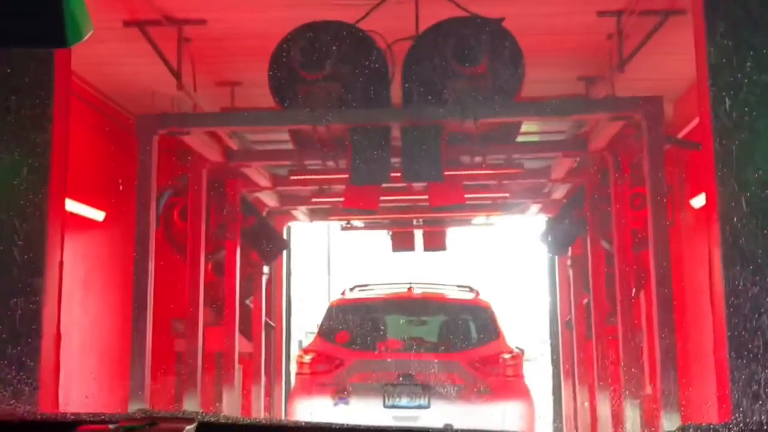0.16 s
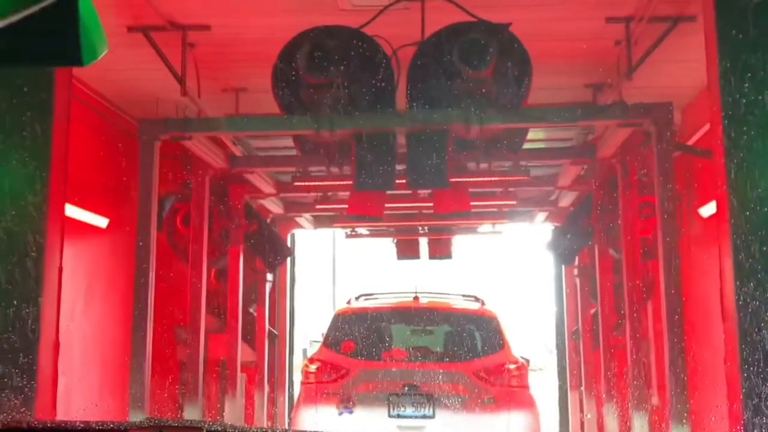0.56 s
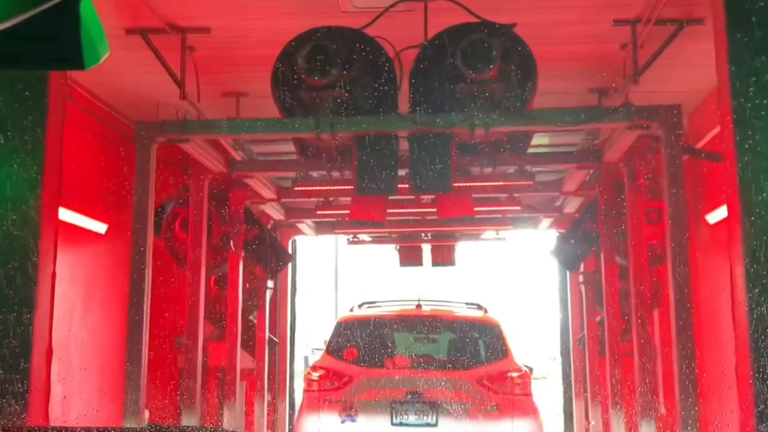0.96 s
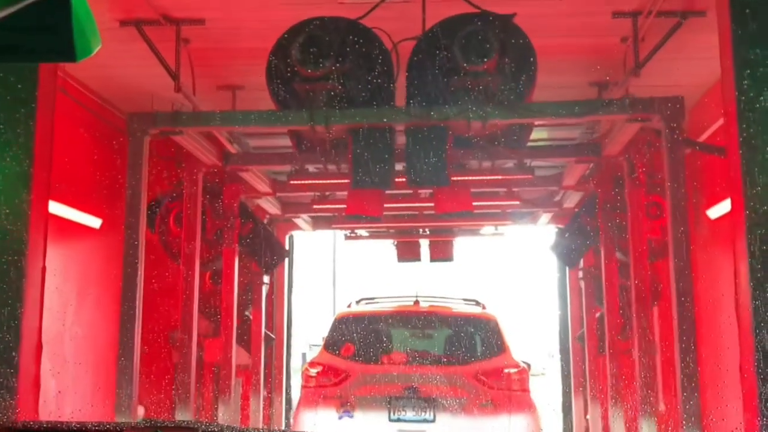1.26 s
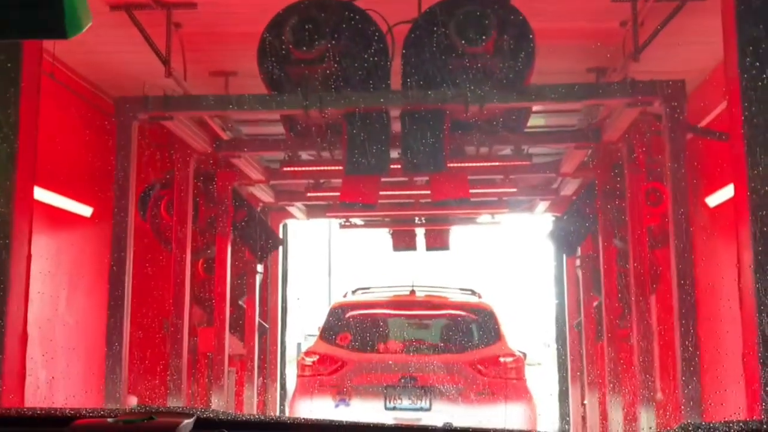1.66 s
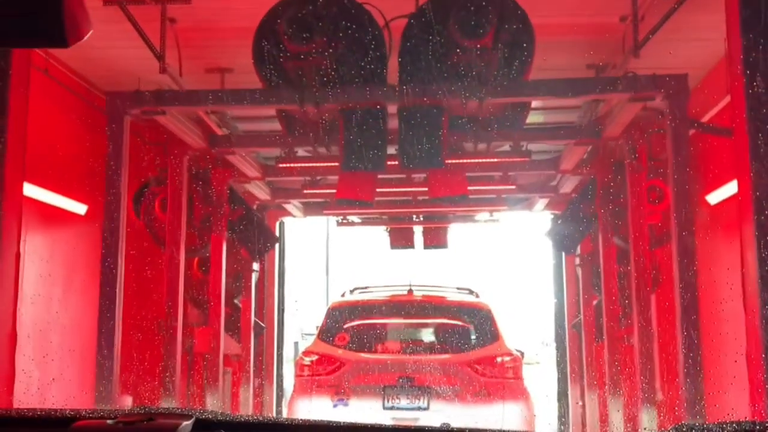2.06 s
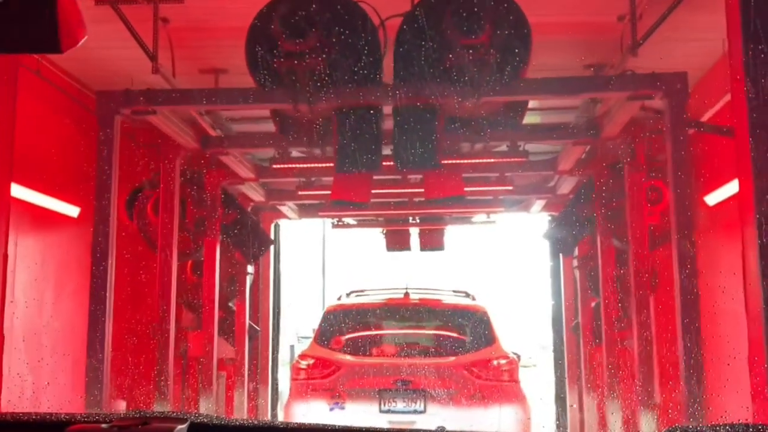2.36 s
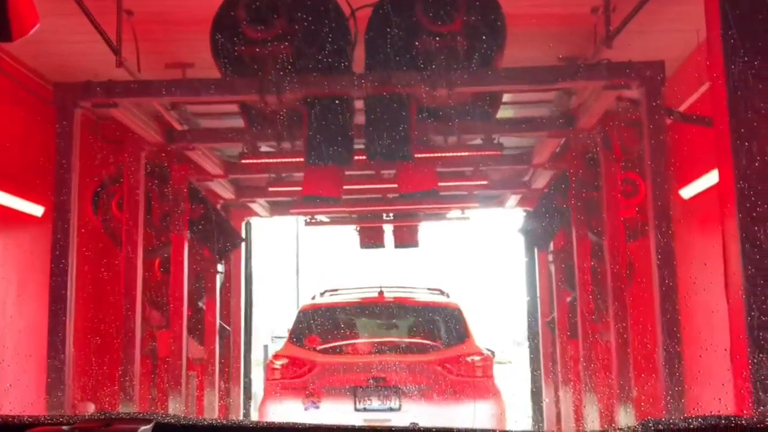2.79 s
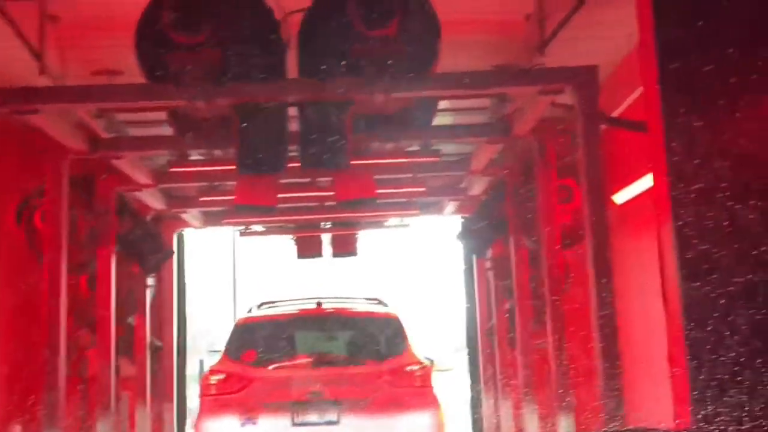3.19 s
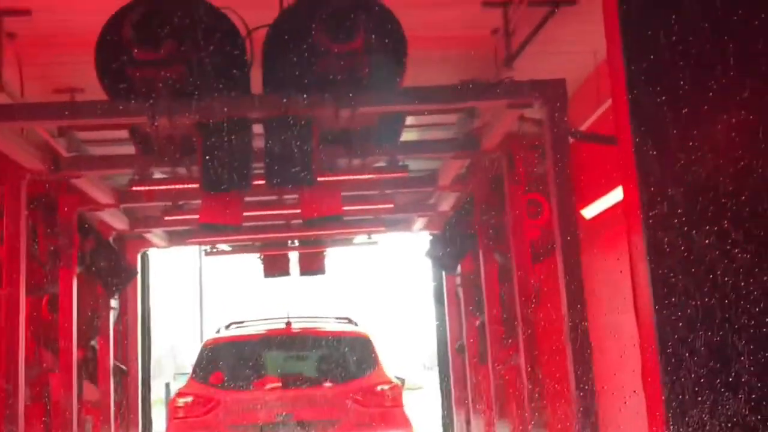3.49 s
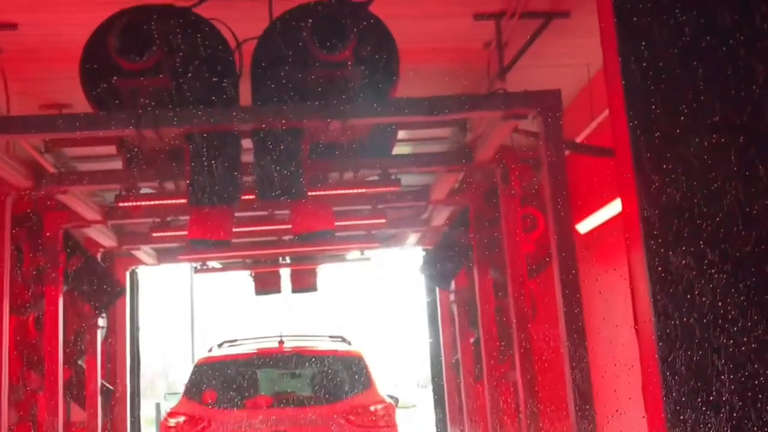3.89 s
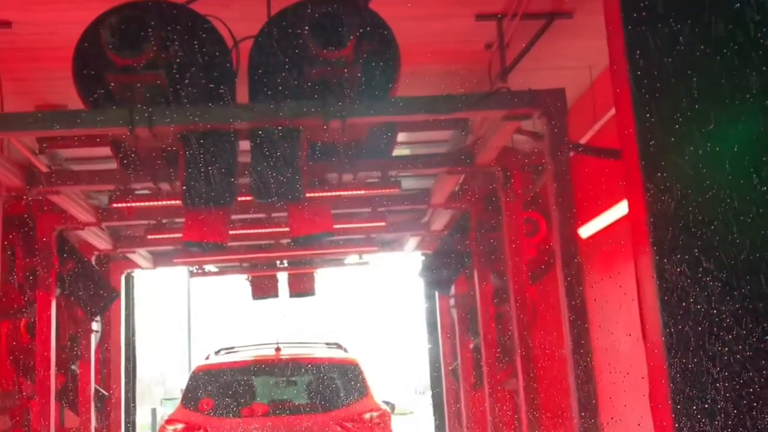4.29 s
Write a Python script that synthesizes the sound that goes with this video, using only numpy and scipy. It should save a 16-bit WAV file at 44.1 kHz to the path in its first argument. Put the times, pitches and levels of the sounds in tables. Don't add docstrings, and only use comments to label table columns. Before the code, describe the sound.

Blower air pounds a car in a wash tunnel, heard from the enclosed cabin by a stereo handheld microphone. Low buffeting pumps the air, the roof drums and wind rushes over the glass. Wavering motor tones beat together. Fine high sizzle from a wet seal stops before two seconds, then tiny sputters and another hiss pass; the roar carries on to an abrupt end.

```python
import sys
import numpy as np
from scipy import signal
from scipy.fft import rfft, irfft
from scipy.io import wavfile
from scipy.ndimage import uniform_filter1d

SR = 44100
rng = np.random.default_rng(int(sys.argv[2]) if len(sys.argv) > 2 else 0)


def ratio(d):
    e = np.asarray(d, float) / 20
    return 10 ** e


def materialize(psi):
    bounded = np.clip(np.atleast_2d(psi).T, -1, 1)
    quanta = np.round(bounded * 32767).astype(np.int16)
    wavfile.write(sys.argv[1], SR, quanta)


N = 196016
T_S = np.arange(N) / SR
HZ = np.arange(N // 2 + 1) * SR / N + 1e-3


def along_hz(table):
    hz, value = np.transpose(table)
    return np.interp(np.log(HZ), np.log(hz), value)


def along_time(table):
    s, value = np.transpose(table)
    return np.interp(T_S, s, value)


def level(x):
    return x / np.sqrt(np.mean(x ** 2))


def bell(centre_s, length_s):
    return np.exp(-.5 * ((T_S - centre_s) / length_s) ** 2)


def swells(table):
    return sum(db * bell(s, length_s) for s, db, length_s in table)


def puffs(table):
    return sum(ratio(db) * bell(s, length_s) for s, db, length_s in table)


def walk(rate_hz, levels=None):
    if levels is None:
        levels = rng.standard_normal(128)
    hold = int(SR / rate_hz)
    steps = np.repeat(levels, hold)[:N + hold]
    return 1.3 * uniform_filter1d(uniform_filter1d(steps, hold), hold)[:N]


def turbulence(pair, colour, gust_db, flicker_db, flicker_hz):
    shaped = pair * ratio(along_hz(colour))
    out, gust = 0, walk(2)
    centres_hz = 16 * 2 ** np.arange(0, 10.5, .5)
    draws = rng.standard_normal((len(centres_hz), 2, 128))
    for hz, (slow, quick) in zip(centres_hz, draws):
        if colour[0][0] / 1.5 < hz < colour[-1][0] * 1.5:
            gust = .8 * gust + .6 * walk(2, slow)
            band = np.cos(np.pi / 2 * np.clip(2 * np.log2(HZ / hz), -1, 1)) ** 2
            gain = ratio(gust_db * gust + flicker_db * walk(flicker_hz, quick))
            out = out + irfft(shaped * band, N) * gain
    return level(out)


def delay(lag_s, in_step_hz):
    return np.exp(-2j * np.pi * (HZ - in_step_hz) * lag_s)


# (frequency [Hz], correlation [0-1])
ALIKE = [(30, 1), (140, 0.97), (240, 0.73), (350, 0.97), (500, 0.93), (650, 0), (840, 0.89), (1000, 0.13),
         (1120, 0.48), (1500, 0.4), (4000, 0), (6000, 0.32)]


def cabin_field(lag_s, in_step_hz=0):
    shared, left, right = rfft(rng.standard_normal((3, N)))
    alike = np.clip(along_hz(ALIKE), 0, 1)
    together = np.array([shared, shared * delay(lag_s, in_step_hz)])
    return np.sqrt(alike) * together + np.sqrt(1 - alike) * np.array([left, right])


def shifting_modes(x, patchy_db, order=2):
    _, _, cells = signal.stft(x, nperseg=1024)
    patches = rng.standard_normal(cells.shape[1:])
    patches = uniform_filter1d(uniform_filter1d(patches, size=order, axis=0), size=5, axis=1)
    _, moved = signal.istft(cells * ratio(patchy_db * level(patches)), nperseg=1024)
    return level(moved[:, :N])


# (frequency [Hz], density [dB per Hz])
BOOM = [(16, -45), (24, -26), (33, -9), (39, -1), (44, 0), (48, -2), (53, -4.5), (60, -3.5), (68, -7),
        (80, -14), (100, -50)]
# (time [s], rise [dB], length [s])
CABIN_SWELLS = [(.3, 4, 0.087), (.53, 9, 0.071), (1.3, -2.5, 0.083), (1.65, 6.5, 0.046), (1.8, -8, 0.065),
                (2.2, 3.5, 0.15), (2.45, -3.5, .08), (2.65, 0.5, .1), (3.09, -11, 0.047), (3.4, 2.5, 0.13),
                (3.85, 0, .08), (4.07, 8.5, 0.069), (4.44, 6, .1)]


def cabin_boom(force_db):
    boom = turbulence(cabin_field(-.0003), BOOM, gust_db=-0.5, flicker_db=1.2, flicker_hz=3.3)
    return boom * ratio(-25.5 + 0.83 * force_db + swells(CABIN_SWELLS))


# (frequency [Hz], density [dB per Hz])
ROOF = [(55, -41), (72, -13.5), (88, 0), (100, -2), (116, -0.5), (140, -5), (170, -6.5), (190, -11.5),
        (250, -8.5), (280, -15.5), (420, -16.5), (540, -16), (590, -32.5), (680, -60.5)]
# (time [s], rise [dB], length [s])
ROOF_SWELLS = [(.11, 0.5, 0.047), (.24, 2, 0.092), (.31, 1.5, 0.024), (.54, 3, 0.053), (.75, 1.5, .06),
               (1.52, -1, 0.044), (2.45, 1.5, .06), (2.72, -0.5, 0.067), (3.1, -0.5, .1),
               (3.56, -2, 0.061), (3.7, 1.5, 0.075), (4.1, 2, .08)]


def roof_drum(force_db):
    roof = turbulence(cabin_field(-.00032), ROOF, gust_db=-0.5, flicker_db=0.03, flicker_hz=6.7)
    return roof * ratio(-20.5 + 0.44 * force_db + swells(ROOF_SWELLS))


# (frequency [Hz], density [dB per Hz])
PANES = [(350, -42), (600, -3.5), (656, -3.5), (689, -5), (708, 1), (751, -6), (847, -1.5), (1020, -8),
         (1110, -2.5), (1220, -8), (1460, -4.5), (1750, -15.5), (2280, -49), (3850, -120)]


def pane_ring(force_db):
    panes = turbulence(cabin_field(0.00019), PANES, gust_db=-0.62, flicker_db=-0.33, flicker_hz=12)
    return shifting_modes(panes, patchy_db=2.2) * ratio(-32 + force_db)


# (frequency [Hz], density [dB per Hz])
GLASS = [(1000, -32), (1700, -2.5), (2310, 0.5), (3410, -3.5), (3770, -6), (5250, -17), (6820, -22.5),
         (7800, -36), (10100, -49), (17200, -120)]


def glass_rush(force_db):
    slanted = cabin_field(.00039, in_step_hz=6500)
    glass = turbulence(slanted, GLASS, gust_db=1.2, flicker_db=-0.4, flicker_hz=12)
    return shifting_modes(glass, patchy_db=1.9) * ratio(-36 + force_db)


# (time [s], level [dB])
FORCE = [
    (0, 1.5),
    (.3, 0),
    (1.6, 0.5),
    (1.9, -0.9),
    (2.6, -1.5),
    (3.0, -1),
    (3.5, 0),
    (4.0, -0.7),
    (4.44, -0.9),
]


def jets():
    force_db = along_time(FORCE)
    return cabin_boom(force_db) + roof_drum(force_db) + pane_ring(force_db) + glass_rush(force_db)


def sweep(start_s, end_s, db, drift_db_s, opens_s, shuts_s):
    opening = .5 + .5 * np.tanh((T_S - start_s) / opens_s)
    shutting = .5 + .5 * np.tanh((end_s - T_S) / shuts_s)
    return ratio(db + drift_db_s * (T_S - start_s)) * opening * shutting


LEAK_OPENS_S, LEAK_SHUTS_S = .15, .1
# (frequency [Hz], density [dB per Hz])
LEAK = [(2500, -60), (5000, -5.5), (6500, 0.5), (8000, 0.5), (10000, 0.5), (11000, -5), (12600, -4),
        (13800, -11), (14900, -40), (15200, -66.5)]
# (start [s], end [s], level [dB], drift [dB per s])
SWEEPS = [
    (-.3, 1.68, -57.5, -1.5),
    (2.92, 3.97, -58, -1.5),
]


def leak_hiss(pair):
    dries_s, dries_db_s = 4.05, -25
    opening = ratio(-64 + dries_db_s * np.maximum(T_S - dries_s, 0))
    passes = sum(sweep(*row, LEAK_OPENS_S, LEAK_SHUTS_S) for row in SWEEPS)
    opening = opening + ratio(3) * (passes + ratio(-18) * puffs(SLAP))
    return turbulence(pair, LEAK, gust_db=.3, flicker_db=1.2, flicker_hz=14) * opening


# (frequency [Hz], density [dB per Hz])
SIZZLE = [(12500, -60), (14400, -2), (14900, 0), (15300, -2), (15700, -4), (15800, -50)]


def spray_sizzle(pair):
    ends_s, stops_s = 1.76, .012
    sizzle = turbulence(pair, SIZZLE, gust_db=.8, flicker_db=1.5, flicker_hz=11)
    return sizzle * sweep(-1, ends_s, -61.5, 0, LEAK_OPENS_S, stops_s)


# (time [s], peak [dB], length [s])
SPUTTERS = [
    (2.02, -81, .008),
    (2.3, -79, .015),
    (2.83, -79, .015),
    (3.15, -76, .07),
    (3.45, -79, .02),
    (3.75, -77, .03),
    (4.3, -86, .1),
]


def late_sputters(pair):
    sputter_hz, width_hz = 14850, 230
    band = np.exp(-.5 * ((HZ - sputter_hz) / width_hz) ** 2)
    return level(irfft(pair * band, N)) * puffs(SPUTTERS) * ratio(4.5)


def seal(lag_s=0.00021, in_step_hz=11000, stray=.3):
    leak, left, right = rfft(rng.standard_normal((3, N)))
    pair = np.array([leak * delay(lag_s, in_step_hz) + stray * left, leak + stray * right])
    return leak_hiss(pair) + spray_sizzle(pair) + late_sputters(pair)


# (time [s], peak [dB], length [s])
SLAP = [
    (0.029, -42, 0.035),
    (0.115, -40, 0.019),
    (0.2, -46, 0.1),
]


def slaps():
    # (frequency [Hz], density [dB per Hz])
    colour = [(1000, -60), (2200, -10), (3200, 0), (5000, -6), (7000, -16), (8000, -70)]
    return puffs(SLAP) * level(irfft(cabin_field(0.00013) * ratio(along_hz(colour)), N))


def panel_level_db():
    return -29 + .9 * along_time(FORCE)


# (frequency [Hz], density [dB per Hz])
PANEL = [(250, -41.5), (290, -6), (320, -2.5), (345, -2), (356, -4.5), (372, -3.5), (400, -4.5), (425, -12),
         (470, -29.5)]
# (time [s], rise [dB], length [s])
SIXTH_CRESTS = [
    (.2, 11.5, 0.085),
    (.58, -5.5, .08),
    (.9, 8, 0.053),
    (1.2, 6.5, 0.22),
    (1.82, 13, 0.097),
    (2.35, 8, 0.1),
    (2.72, 6.5, 0.041),
    (3.45, -4, 0.081),
    (3.8, 4.5, 0.14),
]


def door_panel():
    panel = turbulence(cabin_field(0), PANEL, gust_db=1.1, flicker_db=0.0, flicker_hz=9.8)
    return panel * ratio(panel_level_db() + .4 * swells(SIXTH_CRESTS))


# (shaft [Hz], 2nd [dB], 6th [dB], 12th [dB], 18th multiple [dB], left lead [rad])
FANS = [
    (58.75, -9, -1, 0, -6, 2.2),
    (59.2, -2.5, -2, -6, -4, .3),
    (59.5, -6, -6, -2, -2, -1.8),
]
# (time [s], rise [dB], length [s])
SECOND_CRESTS = [
    (.12, 7.2, 0.031),
    (.82, 24, 0.09),
    (1.7, 13, .1),
    (1.98, 17, 0.15),
    (2.45, 11, 0.033),
    (2.68, 16, .1),
    (2.98, 9.1, .1),
    (3.5, 9, 0.1),
]
# (time [s], rise [dB], length [s])
BLADE_CRESTS = [
    (.2, 17, 0.13),
    (.95, 20.5, 0.091),
    (1.72, 20.7, 0.2),
    (2.15, 18.3, .12),
    (2.85, 18.5, 0.18),
    (3.37, 18, .15),
    (4.0, 12, 0.081),
    (4.42, 20.5, .12),
]


def impellers(wander=.0035, rough_db=4):
    blade_db = swells(BLADE_CRESTS)
    heard_db = {2: -36 + swells(SECOND_CRESTS),
                6: -10 + panel_level_db() + swells(SIXTH_CRESTS),
                12: -56 + blade_db,
                18: -64.5 + blade_db}
    out = 0
    for shaft_hz, *shares_db, lead_rad in FANS:
        turn = 2 * np.pi * np.cumsum(shaft_hz * (1 + wander * walk(6))) / SR
        for (k, here_db), share_db in zip(heard_db.items(), shares_db):
            step = lead_rad * (k / 12) ** 2 * np.array([[.5], [-.5]])
            size = ratio(share_db + here_db + rough_db * walk(8.62))
            out = out + size * np.sin(k * turn + step + rng.uniform(0, 2 * np.pi))
    return out


def scene():
    return jets() + seal() + slaps() + door_panel() + impellers()


# (frequency [Hz], left minus right [dB])
TILT = [(60, 0), (110, -4.5), (200, -0.5), (380, -0.5), (700, 0.5), (1290, 0.5), (2380, -0.5), (4400, -2),
        (8120, -2), (15000, 0.0)]


def two_ports(dry, top_hz=15740):
    grid = slice(0, None, 50)
    hz = np.r_[0, HZ[grid][1:-1], SR / 2]
    tilt_db = along_hz(TILT)[grid]
    ports = [signal.firwin2(2049, hz, (hz < top_hz) * ratio(side * tilt_db), fs=SR) for side in (.5, -.5)]
    return signal.fftconvolve(dry, ports, "same", axes=1)


def roll_off(x):
    return signal.sosfilt(signal.butter(12, 17090, fs=SR, output="sos"), x)


def record(dry):
    fade_s = .0003
    fade = np.clip((N - np.arange(N)) / (fade_s * SR), 0, 1)
    mix = two_ports(dry) * np.sin(np.pi / 2 * fade) ** 2
    return roll_off(mix)


dry = scene()
out = record(dry)
materialize(out)
```